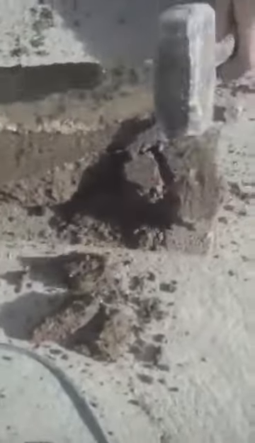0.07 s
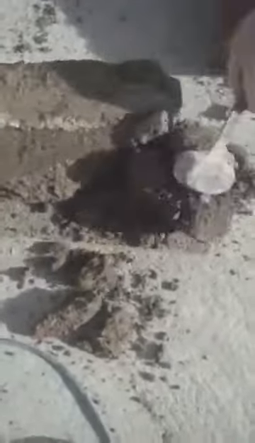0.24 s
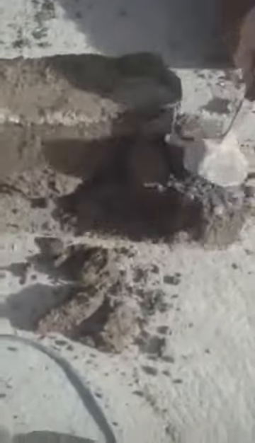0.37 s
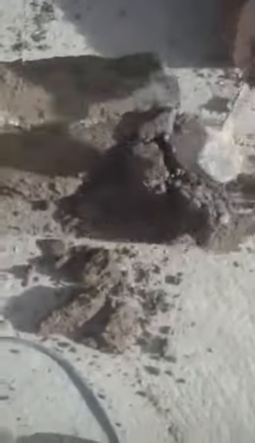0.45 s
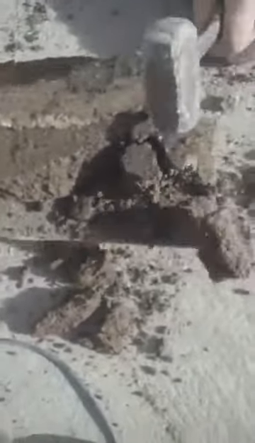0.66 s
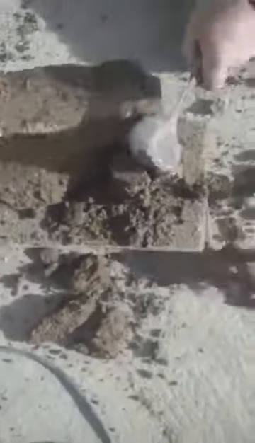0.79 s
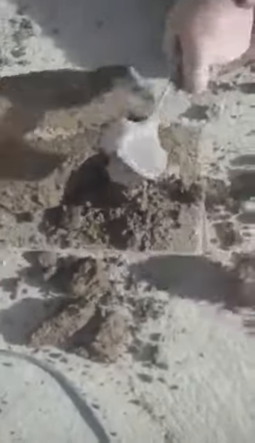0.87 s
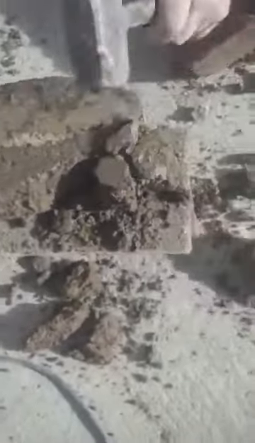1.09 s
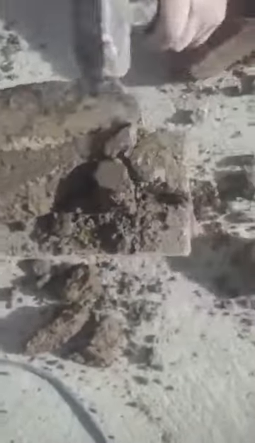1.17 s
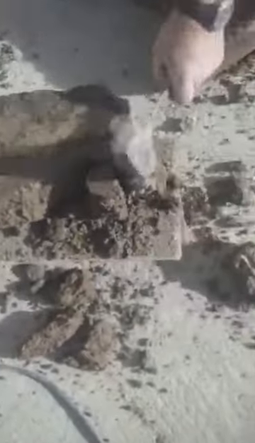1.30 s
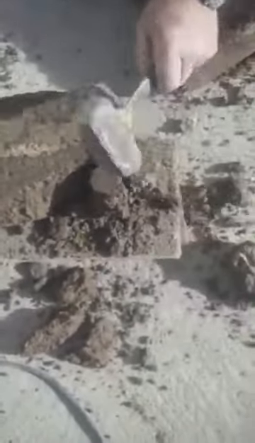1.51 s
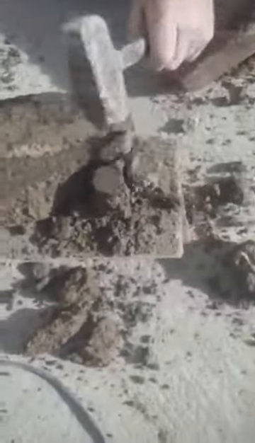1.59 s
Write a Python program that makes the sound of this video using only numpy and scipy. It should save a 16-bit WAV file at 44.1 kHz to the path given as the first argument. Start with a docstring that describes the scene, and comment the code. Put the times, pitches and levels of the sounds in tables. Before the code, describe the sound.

A hammer thumps a concrete block three times, and small fragments click and trickle down.

```python
"""Three dull, heavy blows sound close by, with bits of concrete clattering down between them.
A hammer is hitting a crumbling block: each blow thumps it, crushes grit and wakes a low boom in
the floor and room. Chips click as they fall, a lump knocks on the floor, sand trickles and rubble
shifts. Quiet air hisses behind it all, and a faint high whistle comes in at the end."""
import sys
import numpy as np
from scipy import signal
from scipy.fft import rfft, irfft, next_fast_len
from scipy.io import wavfile

SR = 44100
rng = np.random.default_rng(int(sys.argv[2]) if len(sys.argv) > 2 else 0)


def pcm_store(signal):
    """Save signal as 16-bit PCM."""
    levels = np.round(np.clip(np.atleast_2d(signal), -1, 1) * 32767)
    wavfile.write(sys.argv[1], SR, levels.astype(np.int16).T)


N = 72765


def undb(db):
    """Turn decibels into a number to multiply a sound by."""
    return 10 ** (np.asarray(db) / 20)


def unit(x):
    """Scale a sound so that its average strength (rms) is 1."""
    return x / np.sqrt(np.mean(x ** 2))


def band(x, lo_hz, hi_hz, order=3):
    """Keep the part of a sound between two frequencies."""
    edges = [lo_hz, min(hi_hz, SR / 2 - 100)]
    return signal.sosfilt(signal.butter(order, edges, "band", fs=SR, output="sos"), x)


def colour(x, points):
    """Shape a sound's bass and treble along a curve of (frequency [Hz], level [dB]) points."""
    size = next_fast_len(N) * 2
    hz, db = np.array(points).T
    freqs = np.maximum(np.fft.rfftfreq(size, 1 / SR), 1)
    gain = undb(np.interp(np.log(freqs), np.log(hz), db))
    # Folding the cepstrum onto its first half keeps the filter from sounding before its input.
    cepstrum = irfft(np.log(gain))
    cepstrum[1:size // 2] *= 2
    cepstrum[size // 2 + 1:] = 0
    return irfft(rfft(x, size) * np.exp(rfft(cepstrum)))[:N]


def since(start):
    """Seconds since a moment, zero before it."""
    return np.maximum(np.arange(N) / SR - start, 0)


def fade(start, rise, t60):
    """A quick rise, then a fade; t60 is the fade time, the seconds it takes to drop 60 dB."""
    t = since(start)
    return (1 - np.exp(-t / rise)) * np.exp(-np.log(1000) * t / t60)


def grains(spread_db, size=24):
    """Many tiny breaks: noise whose strength jumps from grain to grain."""
    strength = np.repeat(undb(spread_db * rng.standard_normal(N // size + 1)), size)[:N]
    return unit(rng.standard_normal(N) * strength)


def ring(start, notes):
    """A struck object's notes dying away, each given as (pitch [Hz], level [dB], fade time [s])."""
    t = since(start)
    return sum(undb(db) * np.sin(2 * np.pi * hz * t) * np.exp(-np.log(1000) * t / t60)
               for hz, db, t60 in notes)


def click(start, lo_hz, hi_hz, size=256):
    """One sharp click, heard between two frequencies, with a peak of 1."""
    pulse = band(signal.unit_impulse(size), lo_hz, hi_hz, order=2)
    out, at = np.zeros(N), int(start * SR)
    out[at:at + size] = pulse / np.abs(pulse).max()
    return out


def air():
    """Quiet air: a hiss that swells and sinks."""
    # tone of the hiss (frequency [Hz], relative level [dB])
    tone = [(25, -7), (90, 7), (200, -1.5), (500, -13), (1200, -15), (2800, -16.5), (4400, -12.5),
            (6000, -21), (7100, -12.5), (8500, -23.5), (12000, -22), (16000, -24)]
    # how its loudness moves (time [s], relative level [dB])
    swells = [(0, 5), (.2, 0), (.35, 9), (.55, 2), (.73, 2.5), (.87, 4), (1.05, 5.5), (1.29, -2.5),
              (1.52, 2), (1.65, -5.5)]
    when, db = np.array(swells).T
    hiss = unit(colour(rng.standard_normal(N), tone))
    return undb(-65.5) * hiss * undb(np.interp(since(0), when, db))


def whistle():
    """A thin, wavering whistle far away."""
    # path of the whistle (time [s], pitch [Hz], level [dB])
    path = [(1.44, 5010, -88), (1.453, 5050, -66), (1.52, 5100, -61), (1.562, 4880, -62),
            (1.60, 5090, -73.5), (1.645, 5000, -67)]
    when, hz, db = np.array(path).T
    t = since(0)
    slow_filter = signal.butter(2, 87, fs=SR, output="sos")  # wavers up to about 87 times a second
    waver = unit(signal.sosfilt(slow_filter, rng.standard_normal(N)))
    note = np.sin(2 * np.pi * np.cumsum(np.interp(t, when, hz)) / SR)
    return waver * note * undb(np.interp(t, when, db)) * (t > when[0])


def rubble():
    """Soft low bumps as the pile shifts and settles when the hammer is lifted."""
    # shifts of the pile (time [s], level [dB], fade time [s])
    shifts = [(0.111, -53.5, 0.15), (0.565, -50, 0.12), (0.985, -53, 0.42), (1.098, -44, 0.14),
              (1.196, -57, 0.23)]
    rumble = unit(band(rng.standard_normal(N), lo_hz=72.6, hi_hz=200, order=2))
    return rumble * sum(undb(db) * fade(start, rise=0.0088, t60=t60) for start, db, t60 in shifts)


def sand():
    """Fine grains trickle off the broken edges."""
    # runs of sand (time [s], level [dB], fade time [s])
    runs = [(0.31, -56.5, .5), (0.43, -58, .7), (0.60, -57, .3), (0.93, -63, .7)]
    # tone of the trickle (frequency [Hz], relative level [dB])
    tone = [(400, -15.5), (1200, -3), (2400, -2), (4200, -1), (6000, -11), (9000, -16.5), (16000, -19.5)]
    flow = sum(undb(db) * fade(start, rise=0.0298, t60=t60) for start, db, t60 in runs)
    return flow * unit(colour(grains(spread_db=6.5), tone))


def ticks_and_chips():
    """Short ticks, each at its own pitch. Most are falling chips that skitter; bigger ones also thud."""
    # short ticks, with relative levels for the four parts of their sound
    # (time [s], pitch [Hz], fade time [s], tick [dB], thud [dB], clack [dB], sparkle [dB])
    # The row at 0.1905 s is a faint, brief tick just before the first blow.
    ticks = [(0.112, 3890, 0.031, -38.5, -47.5, -40.5, -51), (0.119, 3600, 0.013, -33, -45, -65, -53),
             (0.1282, 3570, 0.064, -38.5, -65, -48.5, -55), (0.146, 3940, 0.06, -55, -76, -62.5, -89),
             (0.1905, 3100, 0.018, -45, -70, -62, -67), (0.3836, 4100, 0.0092, -37.5, -54, -42, -62),
             (0.4161, 3900, 0.0096, -22, -28.5, -23, -34.5), (0.427, 3910, 0.031, -24, -68, -56, -50),
             (0.4371, 4260, .02, -35, -72, -46, -46), (0.4464, 3900, 0.014, -25.5, -55.5, -49, -57),
             (0.459, 3340, 0.0068, -31, -37.5, -44, -55), (0.531, 4560, 0.01, -35, -64, -45, -35),
             (0.535, 3580, 0.016, -30, -68, -44.5, -64), (0.5415, 3600, 0.037, -32, -63, -46.5, -58),
             (0.5699, 3970, 0.013, -33.5, -42, -65, -60), (0.578, 3300, 0.026, -59, -49, -55, -63),
             (0.624, 3620, 0.018, -35.5, -58, -62, -53), (0.655, 4320, 0.026, -45.5, -60, -52, -48),
             (0.672, 3624, 0.019, -40, -67, -47.5, -70), (0.681, 4460, 0.022, -41, -57, -55, -70),
             (0.828, 3720, 0.068, -34.5, -50, -51, -55), (0.8462, 3540, 0.016, -39, -54, -63, -60),
             (0.8865, 3560, 0.039, -44.5, -50.5, -48, -68), (0.925, 3800, 0.023, -33.5, -34, -39.5, -55.5),
             (1.044, 3800, 0.021, -43, -51, -38.5, -64), (1.0597, 3870, 0.021, -47, -45.5, -46.5, -66),
             (1.085, 4630, 0.016, -50, -68, -51, -60), (1.101, 3720, 0.013, -39, -63, -57, -68),
             (1.1058, 3570, 0.024, -35, -40, -41, -60), (1.1338, 3240, 0.015, -32, -44, -42, -52.5),
             (1.2005, 4210, 0.017, -52.5, -49.5, -59.5, -53), (1.225, 2920, 0.017, -79, -49, -69, -75),
             (1.2342, 2800, 0.028, -44.5, -84, -58, -59), (1.253, 2800, 0.025, -63, -47.5, -55, -55),
             (1.413, 4080, 0.073, -51, -60, -47.5, -80), (1.4755, 4000, 0.024, -44.5, -66.5, -48, -67),
             (1.5129, 3900, 0.028, -44, -65, -55, -70), (1.533, 4630, 0.019, -48.5, -55, -75, -64.5)]
    thud = undb(-0.5) * unit(band(rng.standard_normal(N), lo_hz=110, hi_hz=540, order=2))
    clack = undb(-1.5) * unit(band(rng.standard_normal(N), lo_hz=680, hi_hz=2900))
    sparkle = undb(-6) * unit(band(grains(spread_db=4.5), lo_hz=5500, hi_hz=9600, order=2))
    crackle = grains(spread_db=3)
    out = np.zeros(N)
    for start, hz, t60, tick_db, thud_db, clack_db, sparkle_db in ticks:
        lo_hz, hi_hz = hz / 1.27, hz * 1.27
        tick = undb(-7.5) * unit(band(crackle, lo_hz, hi_hz))
        clatter = (undb(tick_db) * tick + undb(thud_db) * thud
                   + undb(clack_db) * clack + undb(sparkle_db) * sparkle)
        tail = undb(-23.5) * fade(start, rise=0.005, t60=0.17)
        out += clatter * (fade(start, rise=0.00094, t60=t60) + tail)
        click_s = start + 0.000967
        high_click = undb(tick_db) * click(click_s, lo_hz, hi_hz)
        low_click = undb(clack_db) * click(click_s, lo_hz=880, hi_hz=1730)
        out += undb(-5) * (high_click + low_click)
    return out


def lump():
    """A large broken-off piece lands with a gritty knock, and the floor rings under it."""
    # tone of the landing (frequency [Hz], relative level [dB])
    tone = [(40, -9.5), (130, 9.5), (300, 7.5), (500, 9), (750, 7), (1200, -2), (2300, -7.5), (3700, -6),
            (5000, -10.5), (7500, -25.5), (15000, -52)]
    # notes of the floor (pitch [Hz], level [dB], fade time [s])
    floor_notes = [(144, -30, 0.072), (216, -28.5, 0.057), (298, -28.5, 0.052), (760, -33, .025)]
    land_s, knock_s = 0.814, 0.8157
    shape = fade(land_s, rise=0.0006, t60=0.03) + undb(-29) * fade(land_s, rise=0.0055, t60=0.058)
    scrape = undb(-20) * unit(colour(grains(spread_db=0.5), tone)) * shape
    knock = colour(signal.unit_impulse(N, int(knock_s * SR)), tone)
    return undb(-16) * knock / np.abs(knock).max() + ring(knock_s, floor_notes) + scrape


def boom(start):
    """The floor and room boom: two close low notes throb against each other."""
    return ring(start, [(95.2, -55.5, 0.65)]) - ring(start, [(89, -60, 0.65)])


def room_echo(start):
    """The room keeps sounding for a moment after a blow."""
    # tone of the echo (frequency [Hz], relative level [dB])
    tone = [(40, -3.5), (60, 3.5), (90, 1.5), (160, 4.5), (300, -2.5), (550, -5), (900, -7), (1400, -4.5),
            (2500, -15.5), (5000, -31), (12000, -42.5)]
    return undb(-58) * unit(colour(rng.standard_normal(N), tone)) * fade(start, rise=0.018, t60=0.59)


def grit(start):
    """A blow spits out grit: a sharp spray, then a thin trickle."""
    # tone of the grit (frequency [Hz], relative level [dB])
    tone = [(1000, -1), (2500, -7.5), (4200, 9), (5500, -5.5), (7000, -15), (10000, -24.5), (16000, -37)]
    spray = fade(start - 0.0008, rise=0.0008, t60=0.051)  # the crust snaps before the full weight lands
    trickle = undb(-23.5) * fade(start, rise=0.02, t60=0.6)
    return unit(colour(grains(spread_db=2), tone)) * (spray + trickle)


def crunch(start):
    """Concrete is crushed under the hammer in many tiny breaks."""
    # tone of the crunch (frequency [Hz], relative level [dB])
    tone = [(30, 4), (70, 18.5), (200, 5), (400, 0), (700, 0.5), (1000, 0.5), (1400, 5.5), (2000, -3),
            (3000, -4.5), (8000, -27.5)]
    return undb(-24.5) * unit(colour(grains(spread_db=2), tone)) * fade(start, rise=0.009, t60=0.089)


def block_ring(start, t60):
    """The struck block rings briefly on its slab."""
    # notes of the block (pitch [Hz], relative level [dB], fade time [multiples of t60])
    notes = [(136.7, -45, 1.9), (205, -40.5, 0.69), (278, -38.5, 1), (408.3, -36.5, 1), (534.3, -26, 0.79),
             (570.6, -34, 0.52), (579.7, -34.5, 0.79), (782.8, -39.5, .9), (1156, -28, 0.21),
             (1355, -40.5, 0.7), (1524, -38, 0.73), (1738, -41, 1), (1986, -45.5, 0.3), (2247, -49, 1.2)]
    onset = 1 - np.exp(-since(start) / 0.0015)
    return onset * ring(start, [(hz, db, share * t60) for hz, db, share in notes])


def thump(start, bounce_s, bounce_db):
    """The hammer pushes on the block once, then again more softly as it bounces."""
    # tone of the thump (frequency [Hz], relative level [dB])
    tone = [(30, -23.5), (90, -7.5), (280, 2), (420, -2), (560, 6), (750, 0.5), (970, -4.5), (1220, 4),
            (1480, -2.5), (1720, 0.5), (2400, -18.5), (4000, -34), (8000, -30), (16000, -23)]
    # where the slab delays the thump's low notes (frequency [Hz], sharpness [Q])
    slab_delays = [(520, 1.1), (1400, 0.88)]
    push = np.zeros(N)
    push[int(start * SR)] = 1
    push[int((start + bounce_s) * SR)] = undb(bounce_db)
    pulse = colour(push, tone)
    for hz, q in slab_delays:  # all-pass filters stretch the pulse into a short downward wobble
        _, weights = signal.iirpeak(hz, q, fs=SR)
        pulse = signal.lfilter(weights[::-1], weights, pulse)
    return undb(11.5) * pulse


def contact(x, treble_hz, bass_hz):
    """A softer, longer hit passes less treble; a more firmly seated block passes less bass."""
    x = signal.sosfilt(signal.butter(2, treble_hz, fs=SR, output="sos"), x)
    return signal.sosfilt(signal.butter(1, bass_hz, "high", fs=SR, output="sos"), x)


def hammer():
    """Each blow thumps and cracks the block, makes the struck piece clink and stirs the room."""
    # hammer blows, with relative levels (time [s], level [dB], treble cut-off [Hz], bass cut-off [Hz],
    # ring [dB], ring fade time [s], crunch [dB], grit [dB], crack [dB], bounce delay [s], bounce [dB],
    # clink pitch [Hz], clink [dB])
    blows = [(0.2308, 16, 1400, 130, 3.5, 0.088, -3.5, -28, -37.5, 0.0085, -11.5, 1178, -34.5),
             (0.7690, 17, 625, 87.4, -5, 0.078, -8.5, -33.5, -40, 0.0096, -14, 1696, -37),
             (1.3045, 15, 2220, 200, -5, 0.1, 1, -34.5, -28.5, 0.0108, -20, 1347, -30.5)]
    out = np.zeros(N)
    for (start, db, treble_hz, bass_hz, ring_db, ring_t60, crunch_db, grit_db, crack_db,
         bounce_s, bounce_db, clink_hz, clink_db) in blows:
        body = thump(start, bounce_s, bounce_db)
        body += undb(ring_db) * block_ring(start, ring_t60)
        body += undb(crunch_db) * crunch(start)
        room = boom(start) + undb(crunch_db) * room_echo(start)
        clink = np.sin(2 * np.pi * clink_hz * since(start)) * fade(start, rise=0.002, t60=0.035)
        crack = click(start + 0.0012, lo_hz=4000, hi_hz=15000)
        out += undb(db) * (contact(body, treble_hz, bass_hz) + room + undb(clink_db) * clink)
        out += undb(crack_db) * crack + undb(grit_db) * grit(start)
    return out


def scene():
    """Blows, ticks, falling pieces and background meet at one microphone."""
    return (hammer() + ticks_and_chips() + lump() + sand() + rubble() + air() + whistle())[None]


def record(dry):
    """The recorder drops the deepest bass, clips peaks at full scale and cuts the highest treble."""
    bass_hz, top_hz = 34, 16000
    dry = signal.sosfilt(signal.butter(2, bass_hz, "high", fs=SR, output="sos"), dry)
    return signal.sosfilt(signal.ellip(8, .2, 70, top_hz, fs=SR, output="sos"), np.clip(dry, -1, 1))


dry = scene()
out = record(dry)
pcm_store(out)
```